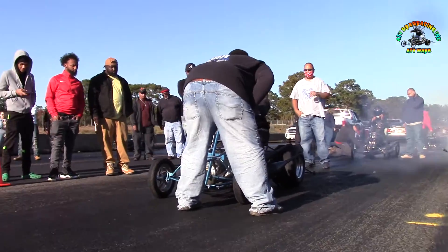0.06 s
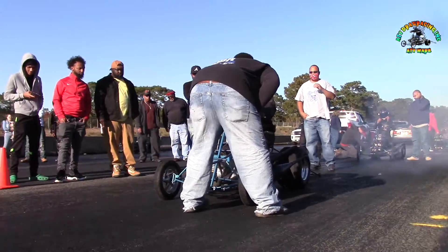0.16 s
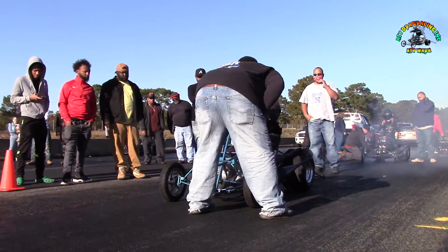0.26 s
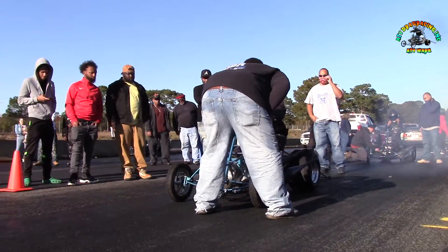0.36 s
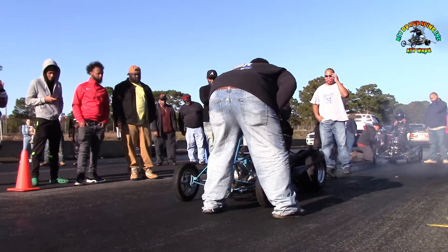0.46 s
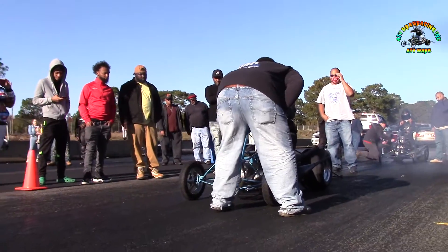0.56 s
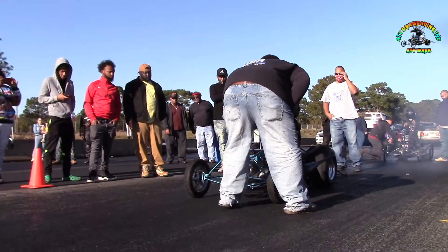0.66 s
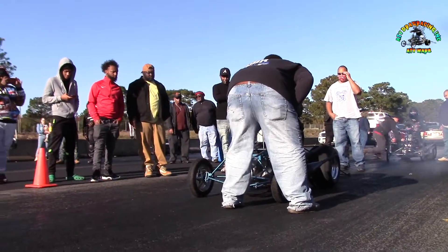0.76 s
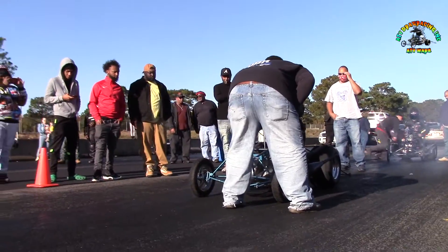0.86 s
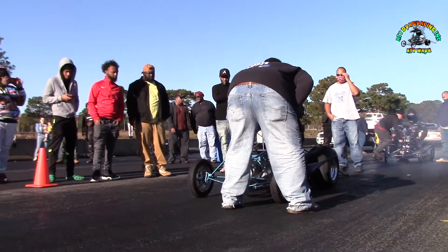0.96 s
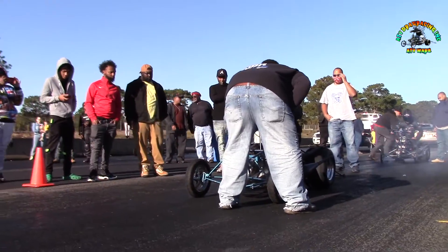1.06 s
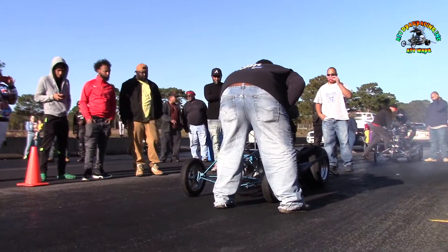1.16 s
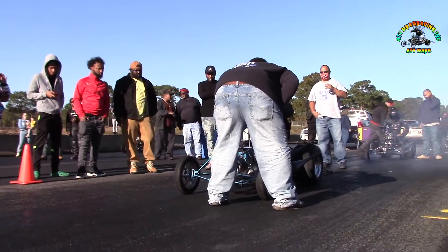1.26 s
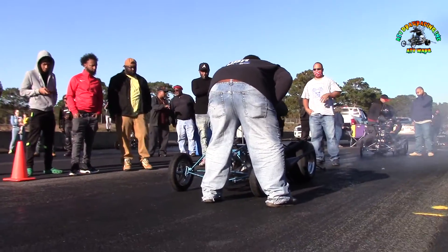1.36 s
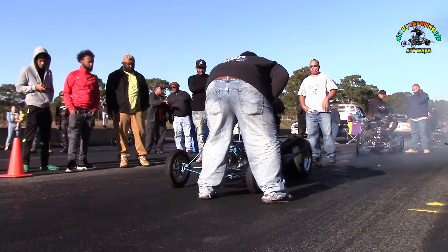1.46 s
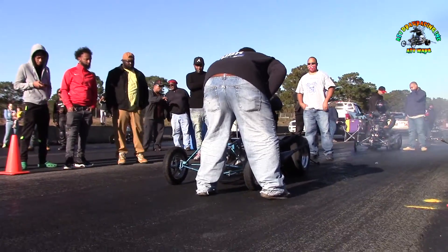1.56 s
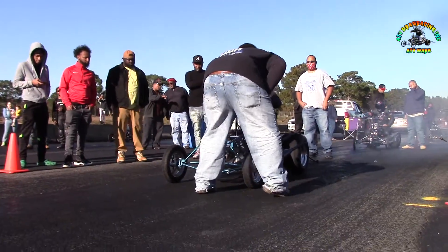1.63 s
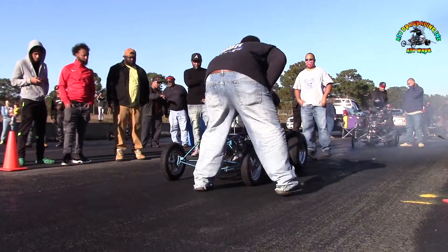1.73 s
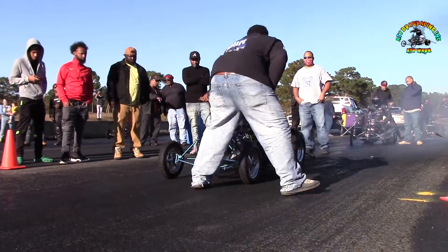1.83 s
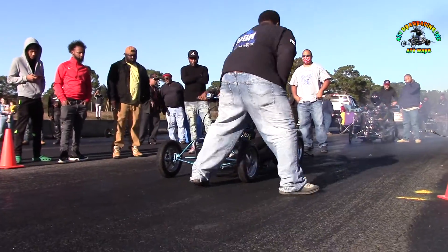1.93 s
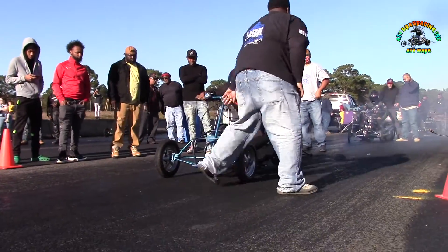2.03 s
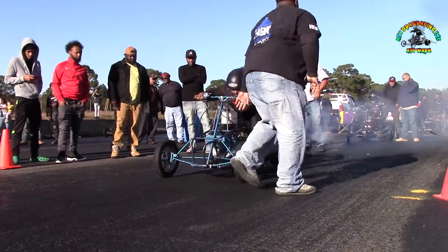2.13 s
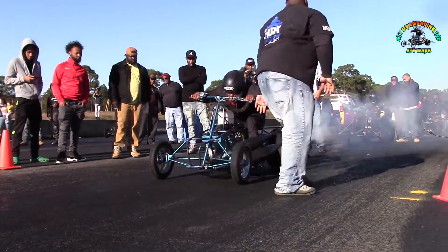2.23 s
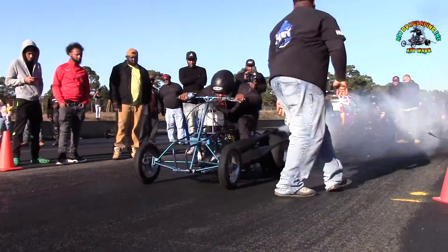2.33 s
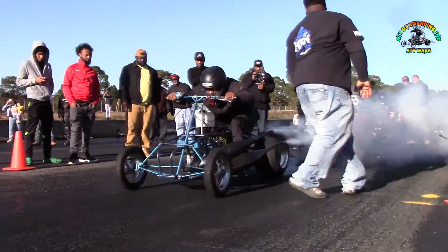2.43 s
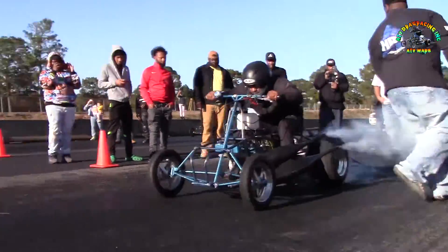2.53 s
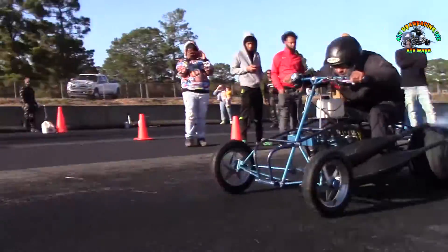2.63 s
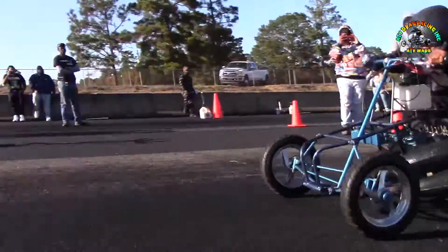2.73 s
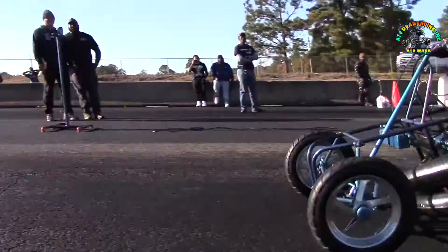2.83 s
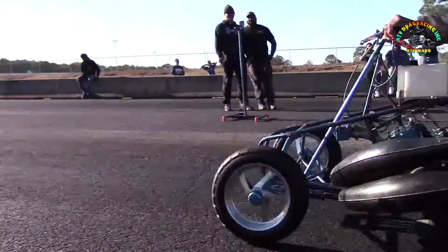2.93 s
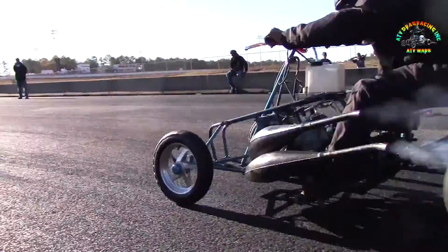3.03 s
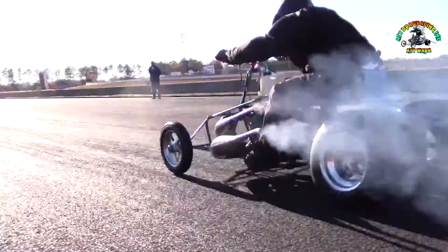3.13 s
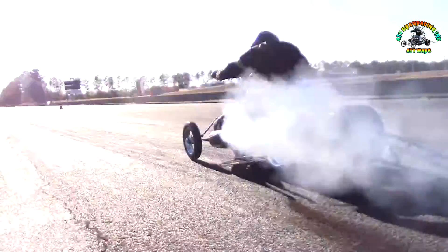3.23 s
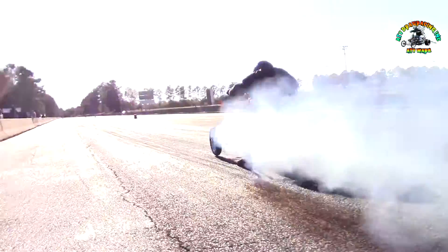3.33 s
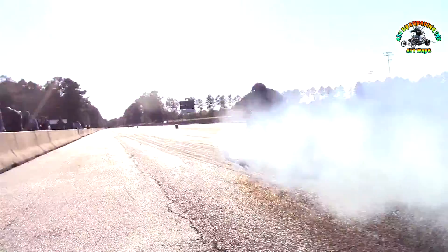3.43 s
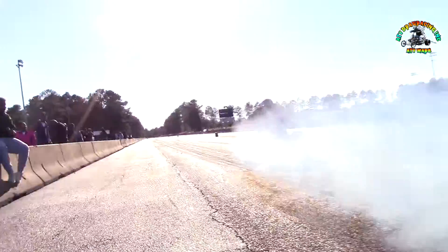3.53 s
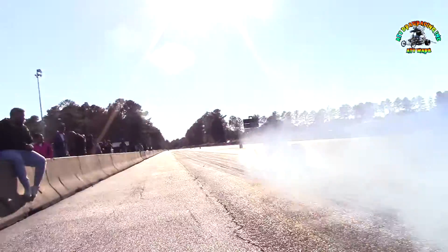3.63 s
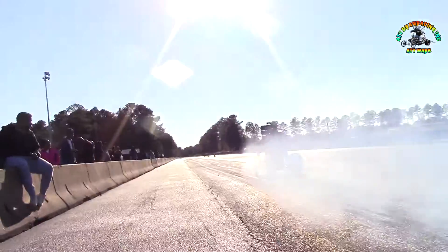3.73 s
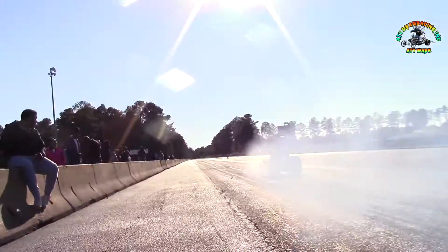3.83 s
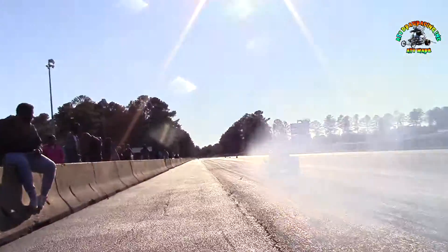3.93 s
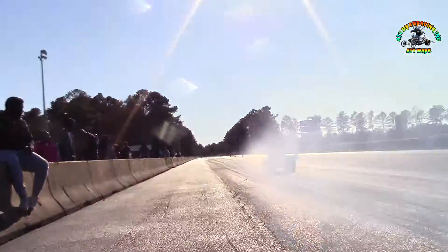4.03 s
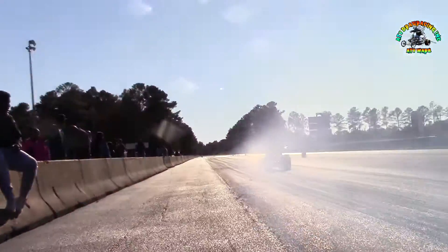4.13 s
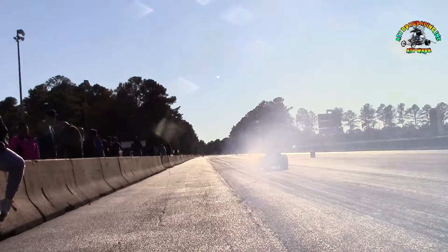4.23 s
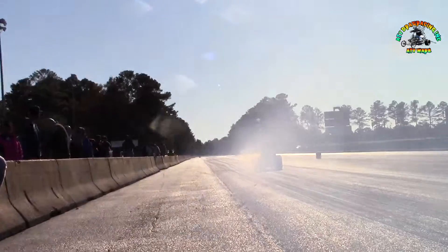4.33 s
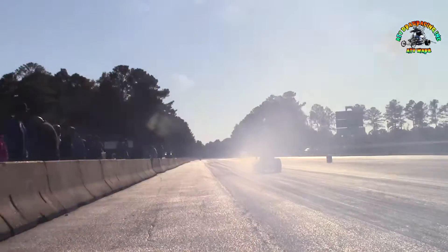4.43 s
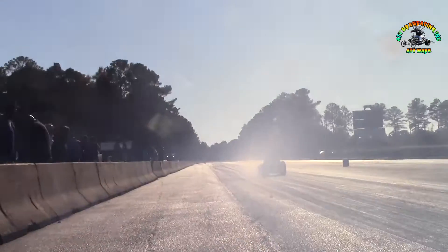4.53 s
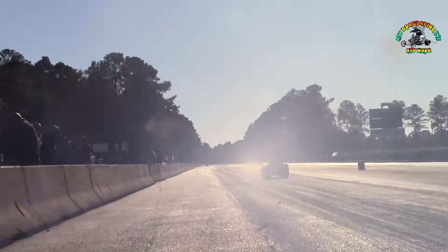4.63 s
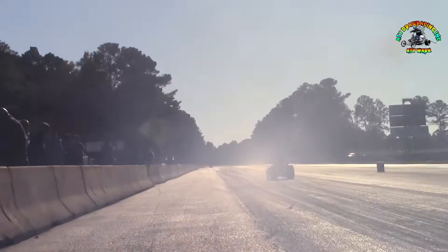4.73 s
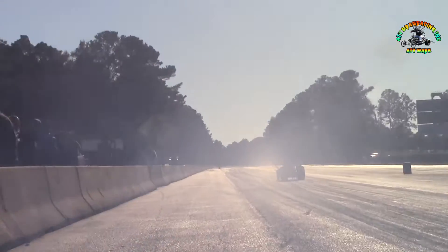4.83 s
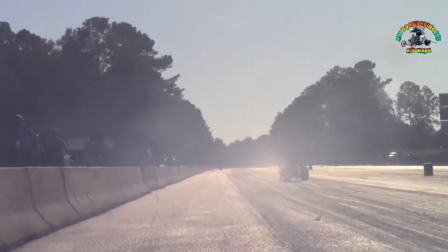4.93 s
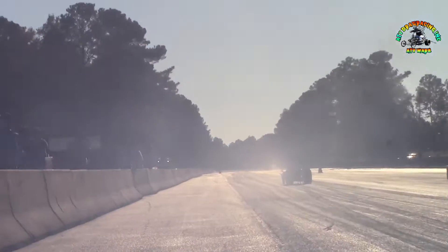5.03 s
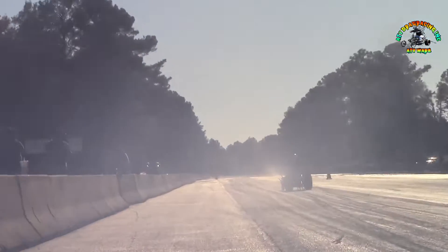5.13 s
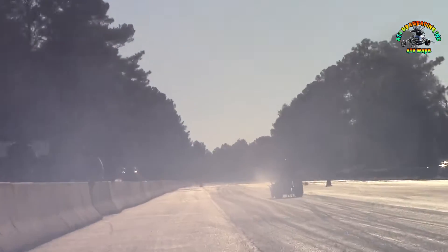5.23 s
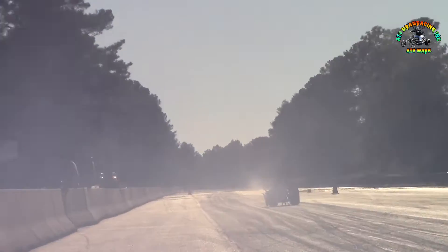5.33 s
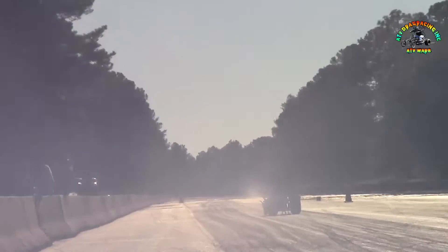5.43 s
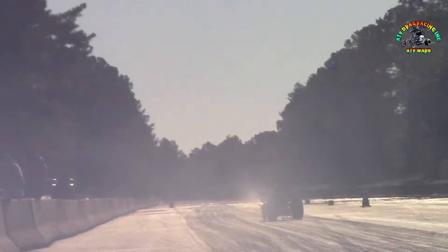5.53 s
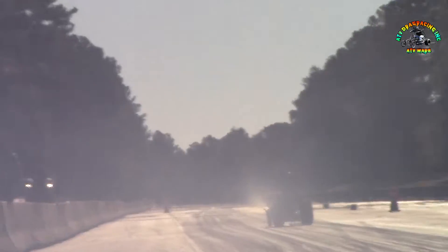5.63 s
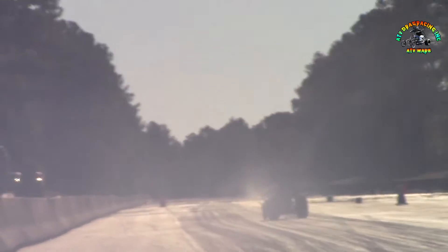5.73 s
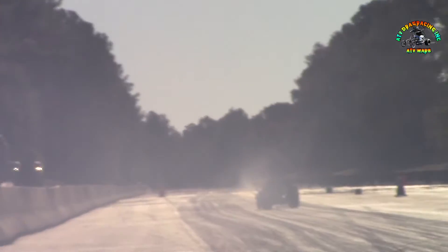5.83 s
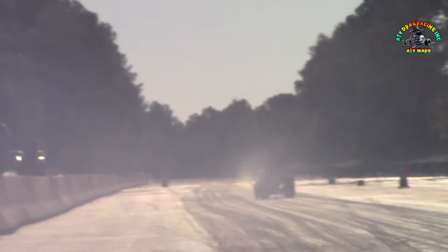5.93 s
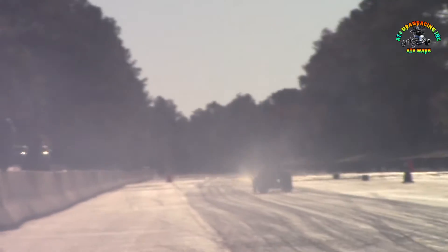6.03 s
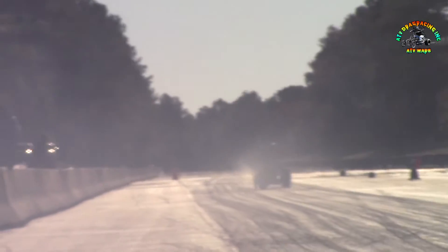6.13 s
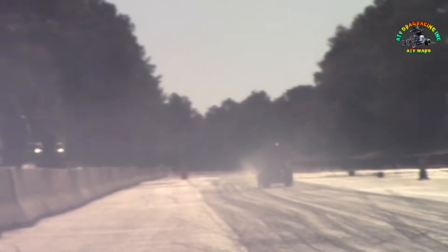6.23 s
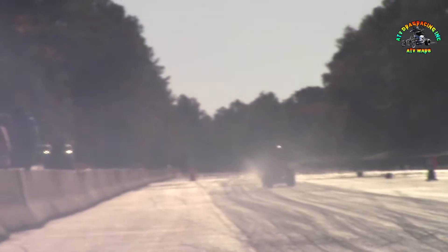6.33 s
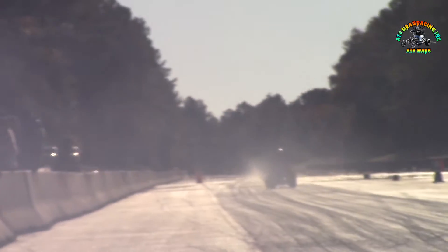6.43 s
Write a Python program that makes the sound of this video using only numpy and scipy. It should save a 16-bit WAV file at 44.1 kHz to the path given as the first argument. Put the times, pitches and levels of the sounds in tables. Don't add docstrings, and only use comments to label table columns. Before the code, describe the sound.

A small two-stroke dragster crackles in sharp stuttering bursts on the line, then screams past close by and shrinks to a dulling drone.

```python
import sys
import numpy as np
from scipy import signal
from scipy.io import wavfile
from scipy.ndimage import uniform_filter1d

SR = 44100
rng = np.random.default_rng(int(sys.argv[2]) if len(sys.argv) > 2 else 0)


def generate_wav(signal):
    frames = np.transpose(np.atleast_2d(signal))
    scaled = np.clip(frames, -1, 1) * 32767
    pcm = np.round(scaled).astype(np.int16)
    wavfile.write(sys.argv[1], SR, pcm)


def makeup_ratio(level_db):
    decades = np.asarray(level_db, float) / 20
    return 10 ** decades


N = 285768
T = np.arange(N) / SR
SLOW_T = T[::32]


def evened(x):
    return x / np.sqrt(np.mean(x ** 2) + 1e-20)


def add(mix, sound):
    part = mix[:len(sound)]
    part += sound[:len(part)]


def curve(rows, t=T):
    s, *columns = np.transpose(rows)
    return [np.interp(t, s, c) for c in columns]


def bumps(rows, t):
    return sum(size * np.cos(np.pi / 2 * np.clip((t - s) / np.where(t < s, before, after), -1, 1)) ** 2
               for s, size, before, after in rows)


def read(points, hz):
    f, value = np.transpose(points)
    return np.interp(np.log(hz + 1), np.log(f + 1), value)


def coloured(x, points):
    level = np.log(makeup_ratio(read(points, abs(np.fft.fftfreq(4096, 1 / SR)))))
    taps = np.fft.ifft(np.exp(np.conj(signal.hilbert(level)))).real[:2048]
    return signal.oaconvolve(x, taps / np.linalg.norm(taps))[:N]


def wander(per_s, count, t=T):
    step = 128
    x = rng.standard_normal((count, N // step + 2))
    x = signal.sosfiltfilt(signal.butter(2, per_s, fs=SR / step, output="sos"), x)
    return [np.interp(t, np.arange(len(row)) * step / SR, evened(row)) for row in x]


# deepest moment in seconds, depth in Hz, fall in seconds, recovery in seconds.
TYRE_SAGS = [(2.28, 28.5, 0.082, 0.1), (3.28, 17, 0.061, .12), (3.5, 2.55, 0.062, 0.095),
             (3.8, 2.1, 0.062, 0.048), (4.07, 12, 0.0298, 0.06), (4.125, 12.3, 0.058, .1),
             (4.4, 11.5, .13, 0.19), (4.71, 9.5, 0.17, 0.12), (4.95, 5.5, 0.15, 0.2),
             (5.215, 7.7, .03, 0.061), (5.3, 17.4, .11, 0.14), (5.79, 9.05, 0.29, 0.089),
             (5.97, 4.56, 0.087, 0.16), (6.18, 5.3, 0.031, 0.051), (6.28, 13.5, 0.14, 0.11),
             (6.42, 3.5, 0.025, 0.089)]


def sag(t):
    return bumps(TYRE_SAGS, t)


# time in seconds, crank turns per second in Hz.
ENGINE_SPEED = [(0.0, 84.85), (0.2, 82.9), (0.42, 88.53), (0.7, 92.33), (1.05, 98.3), (1.2, 104.1),
                (1.44, 108.6), (1.75, 102.6), (1.85, 99.1), (2.07, 104.3), (2.165, 159.7), (2.2, 171.8),
                (2.4, 168.5), (2.46, 171.1), (2.66, 172.9), (2.76, 175.9), (2.92, 177.8), (3.1, 173.2),
                (3.2, 171.6), (3.4, 167.6), (3.66, 167.6), (4.0, 165.3), (4.24, 164), (4.82, 166.5),
                (5.12, 164.3), (5.43, 152.5), (5.88, 159.3), (6.14, 155.9), (6.39, 136.5), (6.48, 132.3)]


def speed(t):
    return curve(ENGINE_SPEED, t)[0] - sag(t)


def kicked_speed(t):
    return speed(t) + 2.8 * (stutter(t) - .5) * (t < 2.1)


def crank():
    return np.cumsum(np.interp(T, SLOW_T, kicked_speed(SLOW_T))) / SR


# time in seconds, delay of the far pipe in turns,
# strength of the far pipe from 0 to 1, level of the clear tone in dB, level of the treble in dB.
PIPES_FACING = [(2.1, 0.01, 0.25, -1.5, 1), (2.3, 0.02, 0, 0.5, -1.5), (2.45, .012, 0.56, -0.5, 6),
                (2.62, 0.017, 0.66, -2, 5.5), (2.74, 0.19, 0.62, -0.5, 2), (3.08, 0.15, 0.59, 0.5, 4),
                (3.18, 0.047, 0.43, 3.5, 1), (3.45, 0.064, 0.54, 1, -1.5), (3.75, 0.08, 0.76, 4, -1),
                (4.0, 0.063, 0.7, -4.5, 1.5), (4.14, 0.058, 1, -5, -0.5), (4.27, 0.073, .8, -1.5, 3.5),
                (4.4, 0.05, 0.96, -1.5, -2), (4.63, 0.074, 1, 1, -0.5), (5.1, 0.059, 0.59, -3.5, -7),
                (5.35, 0.051, 0.99, -5.5, -8), (6.05, 0.062, .88, 1, -12), (6.17, 0.055, 0.4, -1.5, -11),
                (6.24, 0.146, 0.75, 0, -13), (6.48, 0.146, .7, -3.5, -9)]


def facing(t):
    return curve(PIPES_FACING, t)


def firings(jitter_s, spread_db, near_db=0.):
    at = np.flatnonzero(np.diff(np.floor(2 * crank())))
    far_pipe = np.arange(len(at)) % 2 == 0
    late = (facing(T[at])[0] * SR / speed(T[at]) * (T[at] > 2.1)).astype(int) * far_pipe
    chance = rng.standard_normal((len(at), 2))
    size_db = spread_db * np.clip(chance[:, 1], -2, 1) + near_db * ~far_pipe
    moved = at + late + (jitter_s * SR * chance[:, 0]).astype(int)
    clicks = np.zeros(N)
    clicks[np.clip(moved, 0, N - 1)] = makeup_ratio(size_db)
    return clicks


# time in seconds, opening in dB.
THROTTLE_OPENING = [(0, 0), (.4, 0.5), (.9, 0.5), (1.25, 4.5), (2.1, 5)]


def throttle(t):
    return curve(THROTTLE_OPENING, t)[0]


# start in seconds, peak level in dB, length in seconds.
SLOW_STUTTER = [(0.001, -7, 0.018), (0.014, -5, 0.018), (0.107, -6.5, 0.0034), (0.118, -2.5, 0.018),
                (0.15, -6.5, 0.016), (0.227, -2, 0.015), (0.282, -1, 0.012), (0.304, -1.5, 0.0099),
                (0.3802, -1, 0.016), (0.4673, -3.5, 0.026), (0.5304, -5.5, 0.0032), (0.5521, -3, 0.026),
                (0.621, -5, 0.0026), (0.638, -4, 0.039), (0.716, -3, 0.015), (0.764, -4.5, 0.014),
                (0.8006, -2, 0.006), (0.8533, -3, 0.022), (0.916, -5.5, 0.016), (0.964, -3.5, 0.0034),
                (0.9897, -7.5, 0.03), (1.0396, -5, 0.024), (1.071, -5, 0.021)]
QUICK_STUTTER = [(1.1414, -1.5, 0.044), (1.228, -1, 0.023), (1.2711, 2, 0.009), (1.3134, 0, 0.019),
                 (1.348, -0.5, 0.018), (1.4152, -0.3, 0.02), (1.4498, -1, 0.015), (1.5277, -2.5, 0.03),
                 (1.5886, 1, 0.0098), (1.6601, -0.5, 0.024), (1.6955, -1, 0.022), (1.758, -3, .012),
                 (1.7757, -1, .012), (1.8258, 1, 0.0082), (1.843, -0.5, 0.0099), (1.8775, -3, 0.02),
                 (1.923, -2, 0.025), (1.9577, -5, 0.017), (2.026, -3, 0.027), (2.1022, -3, 0.11)]


def stutter(t):
    runs = [(s + length, 1, length + .005, .04) for s, db, length in SLOW_STUTTER + QUICK_STUTTER]
    return np.minimum(bumps(runs, t), 1)


# frequency in Hz, level in dB.
BLAST_COLOUR = [(300, -30), (1200, -51), (2200, 4.5), (3300, 7.5), (5500, 4), (9000, 0), (12000, -11),
                (16000, -33)]
# frequency in Hz, level in dB.
WALL_RATTLE_COLOUR = [(150, -40), (360, -19.5), (500, -3.5), (900, -8), (1800, -3.5), (2800, 1), (3800, -1),
                      (5000, -7.5), (7000, -7.5), (9500, -13.5), (16000, -44)]


def cracks():
    hard, gas, j = np.zeros(N), np.zeros(N), np.arange(14)
    for s, db, length in SLOW_STUTTER + QUICK_STUTTER:
        chance = rng.standard_normal((len(j), 2)) * (j[:, None] > 0)
        after = j / (2 * speed(s)) + .0002 * chance[:, 0]
        at = np.round((s + after) * SR).astype(int)
        size_db = db + 9 - 6.5 * (j % 2) - 2.5 * (j == 0) + 2.3 * np.minimum(chance[:, 1], .8)
        size = makeup_ratio(size_db) * np.exp(-(after / length) ** 4)
        np.add.at(hard, at, size)
        np.add.at(gas, at, size * makeup_ratio(-1.5 * np.exp(-after / .0051)))
    weak = makeup_ratio(-13 + 2.08 * throttle(T)) * firings(.0003, spread_db=1, near_db=4) * (T < 2.13)
    weak *= uniform_filter1d(hard, 500) < .3 / 500
    t = np.arange(6000) / SR
    blast, rattle, lane = np.zeros(N), np.zeros(N), rng.integers(0, 6, N)
    for k in range(6):
        spit = .3 * rng.standard_normal(60) * makeup_ratio(-60 * t[:60] / .003) + (t[:60] == 0)
        add(blast, signal.oaconvolve((hard + weak) * (lane == k), spit / np.linalg.norm(spit))[:N])
        tail = rng.standard_normal(len(t)) * makeup_ratio(-60 * t / .2) * (1 - np.exp(-(t / .00054) ** 2))
        shaken = (gas + .5 * weak) * (lane == k)
        add(rattle, signal.oaconvolve(shaken, tail / np.linalg.norm(tail))[:N])
    hiss = rng.standard_normal(len(t)) * makeup_ratio(-60 * t / .077) * (1 - np.exp(-t / .00054))
    add(blast, signal.oaconvolve(gas + .6 * weak, hiss / np.linalg.norm(hiss))[:N])
    return coloured(blast, BLAST_COLOUR) + makeup_ratio(2.57) * coloured(rattle, WALL_RATTLE_COLOUR)


def place(t):
    launch_s, start_m, pass_m, pull_m_per_s2 = 2.3, 5, 3, 18
    along = .5 * pull_m_per_s2 * np.maximum(t - launch_s, 0) ** 2 - start_m
    metres = np.hypot(along, pass_m)
    return metres, .5 + .5 * along / metres


# time in seconds, level in dB.
PULLING_EFFORT = [(2.1, -16), (2.14, -13.5), (2.53, -13), (2.64, -19), (3.29, -17), (3.78, -24),
                  (4.01, -23), (4.14, -15.5), (4.62, -19.5), (5.01, -21.5), (5.08, -24.5), (5.33, -13),
                  (5.45, -18), (5.95, -18), (6.1, -26), (6.11, -26.5), (6.25, -20.5), (6.48, -24)]
# peak in seconds, change in dB, way in in seconds, way out in seconds.
PIPE_SURGES = [(2.16, 5.5, 0.065, 0.03), (3.07, -1.5, 0.25, 0.055), (3.48, 2, 0.21, 0.086),
               (3.67, 1.5, 0.14, 0.044), (4.28, -4, 0.068, 0.022), (4.33, 1.5, 0.049, 0.11),
               (4.49, -0.5, 0.058, 0.026), (4.53, 2.5, 0.025, 0.05), (5.03, 2, 0.025, 0.042),
               (5.27, -2.5, 0.028, 0.036), (5.58, -2.5, 0.027, 0.034), (5.81, -3, 0.04, 0.046),
               (6.41, 0, 0.042, 0.032)]


def effort(t):
    return curve(PULLING_EFFORT, t)[0] + bumps(PIPE_SURGES, t)


# peak in seconds, added roughness, way in in seconds, way out in seconds.
GEAR_STUMBLES = [
    (2.15, 1.2, .05, .07),
    (2.26, 1., .06, .08),
    (3.6, .3, .3, .4),
    (3.28, .5, .06, .08),
    (4.07, .9, .02, .06),
    (5.21, 1., .02, .07),
    (5.33, .5, .05, .05),
    (6.17, .9, .02, .05),
    (6.24, .7, .04, .05),
    (6.4, .6, .015, .03),
]


def stumble(t):
    return bumps(GEAR_STUMBLES, t)


# time in seconds, share from 0 to 1.
SURFACE_SMEAR = [(2.1, 1), (4.04, .9), (4.065, 0)]


def smear(t):
    return curve(SURFACE_SMEAR, t)[0]


# time in seconds, centre in Hz, width in octaves, lift in dB.
PIPE_BEAM = [(2.1, 2507, 0.25, 2.5), (2.38, 2997, 0.41, 6.5), (2.5, 3300, 0.38, 12.5),
             (2.75, 2320, 0.79, 0.5), (3.2, 2010, 0.4, 0.5), (3.65, 2182, 0.39, 15), (4.0, 2100, 0.39, 1.5),
             (4.35, 2840, 0.4, 6), (4.7, 2343, 0.12, 6.5), (5.0, 1894, 0.8, -4), (5.4, 1360, 0.92, 15),
             (6.1, 1467, .38, 10.5), (6.48, 1607, 0.56, 4)]
GROUND_LIFT = [(2.1, 1100, 0.32, -1), (2.35, 1110, 0.25, 4.5), (3.0, 1116, 0.32, -3.5),
               (3.3, 1279, 0.18, -3), (3.45, 1130, 0.25, 7), (3.65, 1165, 0.2, 11), (3.9, 1110, 0.37, 4),
               (4.1, 998, .2, 3), (4.25, 1348, 0.24, 10), (4.65, 1339, 0.33, 7), (4.8, 1293, 0.43, 3.5),
               (5.05, 1441, 0.11, 5), (5.25, 1500, 0.18, 0.5), (5.45, 1241, 0.31, -0.5),
               (6.1, 1256, 0.24, 2.5), (6.3, 690, 1, 5), (6.48, 701, 0.51, 2)]
LANE_BOOM = [(2.1, 670, 0.15, -6), (2.6, 664, .2, -3.5), (3.3, 666, 0.24, 3), (3.42, 610, .27, 9.5),
             (4.08, 580, 0.23, 8), (4.16, 639.8, .2, 0), (4.95, 634, 0.18, 3.5), (5.1, 639.3, .2, 4),
             (5.35, 586, 0.16, -8), (5.75, 590, 0.23, -5.5), (6.0, 619, 0.19, 4), (6.15, 622.8, .2, -0.5),
             (6.26, 550, 0.17, 17), (6.48, 540, 0.15, 12)]
CHAIN_RASP = [(2.1, 6230, 0.17, -3.5), (2.6, 6000, .2, 1), (2.75, 5600, .15, -1), (2.95, 5360, 0.18, -2),
              (3.1, 5600, 0.22, 5), (3.25, 5806, 0.17, 0), (3.5, 5514, 0.19, -0.5)]


def beam(hz, t):
    lift = 0
    for table in (PIPE_BEAM, GROUND_LIFT, LANE_BOOM, CHAIN_RASP):
        centre_hz, octaves, lift_db = curve(table, t)
        lift = lift + lift_db * np.exp(-.5 * (np.log2((hz + 1) / centre_hz) / octaves) ** 2)
    return lift


def steady(x, db):
    loudness = np.sqrt(abs(uniform_filter1d(x ** 2, size=6000)) + 1e-12)
    return np.interp(T, SLOW_T, makeup_ratio(db)) * x / loudness


# frequency in Hz, level in dB.
IDLE_COLOUR = [(90, -25), (200, -17), (340, -36), (420, -7), (500, 5.5), (570, 2.5), (640, -15.5),
               (720, -6), (900, -11.5), (1100, 14.5), (3000, -12), (6000, -31)]
# frequency in Hz, level in dB.
PULLING_COLOUR = [(82, -62.5), (140, -45), (307, -2.5), (502, -7.5), (601, -8.5), (781, -4.5), (1410, 4),
                  (3190, 5), (4430, -7.5), (7000, -29), (9100, -48), (15400, -120)]
# deepest moment in seconds, depth in dB, fall in seconds, recovery in seconds.
GROUND_NULLS = [(2.2, -5.5, 0.17, 0.33), (3.08, 9, 0.58, 0.24), (3.67, 7, 0.024, 0.03),
                (3.98, 2.5, 0.078, 0.056), (4.65, 5.5, 0.49, 0.56), (5.23, 5, 0.054, 0.23),
                (5.79, 4.5, 0.2, 0.16), (6.07, 3, 0.43, 0.17), (6.36, -2.5, .12, 0.26)]


def drone():
    t = SLOW_T
    running, (metres, tail), blur = stutter(t), place(t), smear(t)
    hz = kicked_speed(t)
    lag, far, clear_db = facing(t)[:3]
    turns = crank() + .003 * wander(60, count=1)[0]
    load = np.clip((t - 2.09) / .084, 0, 1)
    idle = 1 - load

    idle_db = 1.57 * throttle(t) + 3 * running - .5 * t
    pull_db = effort(t)
    pull_low_db = -26 + .12 * pull_db - .021 * metres - bumps(GROUND_NULLS, t)
    low_db = np.where(load > 0, pull_low_db, -36.5 + idle_db)
    pull_high_db = 1 + clear_db - 4 * stumble(t) + pull_db
    high_db = idle * (-42 + idle_db) + load * pull_high_db
    rough = .7 * idle + load * (.28 + .025 * sag(t) + .0012 * metres + stumble(t))
    flicker = np.minimum(rough + .3 * blur * load, .85)

    far = load * np.clip(far, 0, .95)
    shade_db = -4.5 + 6 * tail
    low, high = np.zeros(N), np.zeros(N)
    chances = zip(wander(6, count=36, t=t), wander(35, count=36, t=t))
    for k, (swell, flutter) in enumerate(chances, 1):
        pair = 1 + far * np.exp(-2j * np.pi * k * (.5 + lag))
        pulling_db = read(PULLING_COLOUR, k * hz) + beam(k * hz, t)
        pulling_db += shade_db * np.exp(-.5 * (np.log2(k * hz / 880) / .45) ** 2)
        level_db = load * pulling_db + idle * read(IDLE_COLOUR, k * hz)
        level_db += (2.4 - .7 * load + 1.2 * load * blur) * swell
        level_db += 3 * idle * flutter
        level_db += 4 * min(k / 8, 1) * flicker * flutter[::-1]
        level_db -= 10 * (k == 1)
        phase = np.pi + np.angle(pair) - (.018 + .11 * blur) * k * k
        phase += 1.6 * (1 - tail) * swell[0]
        phase += .05 * k * rough * flutter
        size, upper = makeup_ratio(level_db) * abs(pair), np.clip((k * hz - 850) / 100, 0, 1)
        tone = np.cos(2 * np.pi * k * turns + np.interp(T, t, phase))
        add(low, tone * np.interp(T, t, size * (1 - upper)))
        add(high, tone * np.interp(T, t, size * upper))
    return steady(low, uniform_filter1d(low_db, size=20)) + steady(high, high_db)


def barriers(x):
    taps, count = np.zeros(13000), 600
    at = 500 + np.arange(count) * 20 + rng.integers(0, 20, count)
    taps[at] = rng.choice([-1., 1.], count) * makeup_ratio(-60 * at / SR / .27)
    echo_db = -13 + .25 * sag(SLOW_T) + .02 * place(SLOW_T)[0]
    echo = signal.oaconvolve(x, taps / np.linalg.norm(taps))[:N]
    return np.interp(T, SLOW_T, makeup_ratio(echo_db)) * echo


# strongest moment in seconds, lift in dB, rise in seconds, fall in seconds.
WIND_GUSTS = [(0.0, 19, .05, 0.06), (1.8, 13, 0.72, 0.29), (2.14, 27, 0.093, 0.19), (2.6, 30.5, 0.42, 0.62),
              (3.0, 15.5, 0.35, 0.11), (3.3, 28, 0.32, 0.31), (3.6, 26, 0.28, 0.062), (3.92, 5, 0.32, 0.4),
              (4.75, 23, 0.49, 0.16), (5.94, 3, 0.081, 0.096), (6.24, 8, 0.11, 0.047)]
# frequency in Hz, level in dB.
WIND_COLOUR = [(20, -26), (100, -38), (150, -15), (200, -15.5), (260, -13.5), (400, -10.5), (800, -88)]


def rumble():
    noise = coloured(rng.standard_normal(N), WIND_COLOUR)
    gust_db = np.interp(T, SLOW_T, bumps(WIND_GUSTS, SLOW_T))
    return makeup_ratio(-72 + gust_db + 2.5 * wander(15, count=1)[0]) * noise


# frequency in Hz, level in dB.
GAS_COLOUR = [(18, -79), (30, -88), (215, -85), (345, -5), (404, -4.5), (684, 0.5), (760, -1), (866, -2.5),
              (1130, -0.5), (1540, 2), (5450, 2), (10800, -1.5), (16000, -10)]


def roar():
    puff = np.exp(-np.arange(300) / (.0018 * SR))
    gate = evened(signal.oaconvolve(firings(.000085, spread_db=0), puff)[:N])
    even_flow = .9 - .75 * (1 - .6 * smear(T)) * place(T)[1] ** 4
    strength = np.sqrt(even_flow ** 2 + 2 * even_flow * gate.mean() + 1)
    gas = (even_flow + gate) / strength * rng.standard_normal(N)
    hz, t, z = signal.stft(gas, SR, nperseg=512, noverlap=384)
    hz = hz[:, None]
    metres, tail = place(t)
    level_db = effort(t) + 6.5 - 13 * np.log10(metres / 5)
    level_db += -.0244 * sag(t) + 3 * stumble(t)
    treble_db = -11.5 + facing(t)[3] - .0037 * metres + .14 * sag(t)
    body_db = -4.5 + .1253 * metres
    above = np.clip((hz - 5600) / 5400, 0, 2.2)
    below = np.clip(np.log2(5600 / (hz + 1)) / .5, 0, 1)
    colour = read(GAS_COLOUR, hz) - read(GAS_COLOUR, 5500.0)
    colour = colour + above * treble_db + below * body_db + level_db
    colour += .5 * beam(hz, t)
    colour += -5.5 * tail ** 4 / (1 + (hz / 1500) ** 4)
    out = signal.istft(z * makeup_ratio(colour), SR, nperseg=512, noverlap=384)[1][:N]
    return out * np.clip((T - 2.09) / .17, 0, 1)


# time in seconds, difference in dB.
PORT_SPREAD = [(0, -17), (2.05, -21.5), (2.12, -29), (2.68, -14), (2.8, -5), (3.12, -14), (3.2, -26),
               (3.75, -18), (4.05, -23)]


def scene():
    rough, tone = roar() + cracks(), drone()
    scatter = rng.standard_normal(400) * np.exp(-np.arange(400) / 200)
    side = signal.oaconvolve(rough, scatter / np.linalg.norm(scatter))[:N]
    side = signal.sosfilt(signal.butter(2, 9000, "high", fs=SR, output="sos"), side)
    side *= makeup_ratio(curve(PORT_SPREAD)[0] + 10.2 * wander(7.7, count=1)[0] * (T < 2.1))
    small_pipes = signal.butter(5, 235, "high", fs=SR, output="sos")
    mid = signal.sosfilt(small_pipes, rough + tone + barriers(tone)) + rumble()
    return np.array([mid + side, mid - side])


def band_limit(x):
    return signal.sosfilt(signal.butter(12, 16500, fs=SR, output="sos"), x)


# time in seconds, highest peak.
LIMITER_CEILING = [(0, .68), (1.05, .62), (1.15, .84), (2.57, .86), (2.63, .56), (3.6, .55), (4.1, .66)]


def record(dry):
    limited = dry / (1 + (dry / curve(LIMITER_CEILING)[0]) ** 6) ** (1 / 6)
    limited = signal.sosfilt(signal.butter(2, 110, "high", fs=SR, output="sos"), limited)
    edge = signal.firwin(301, 15900, window=("kaiser", 9), fs=SR)
    mix = signal.oaconvolve(limited, edge[None], "same")
    return band_limit(mix)


dry = scene()
out = record(dry)
generate_wav(out)
```